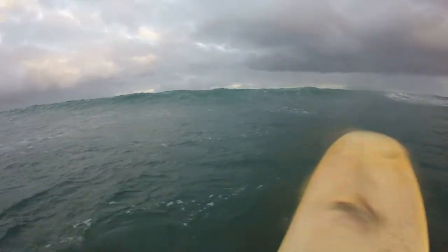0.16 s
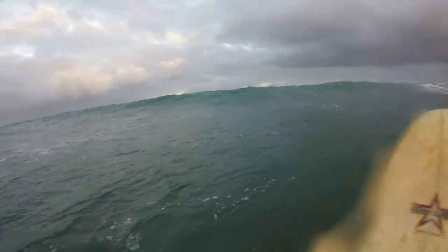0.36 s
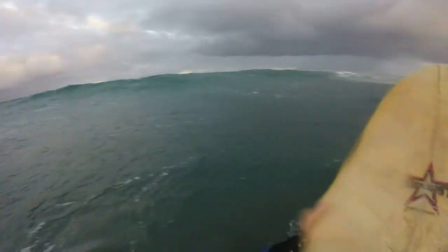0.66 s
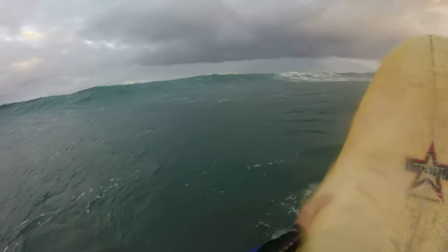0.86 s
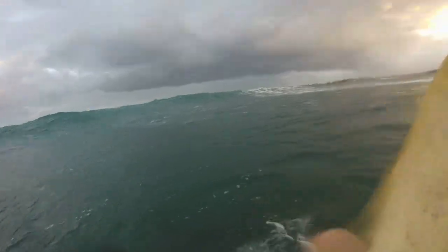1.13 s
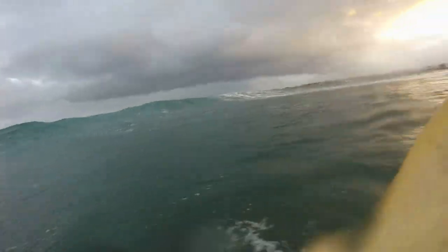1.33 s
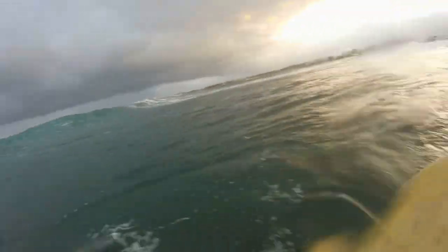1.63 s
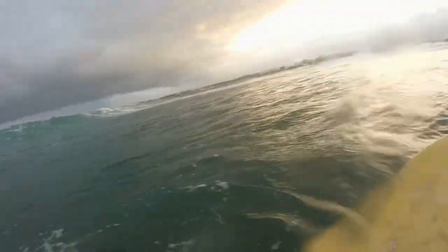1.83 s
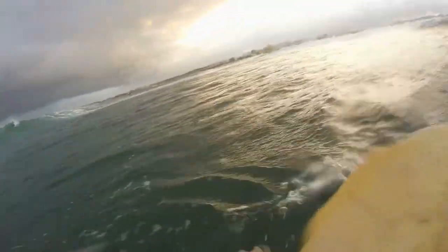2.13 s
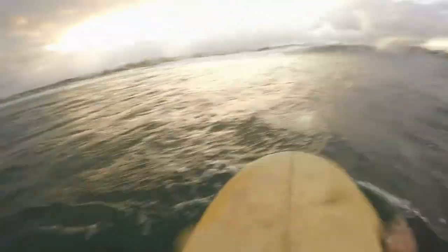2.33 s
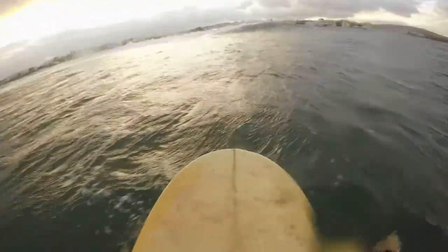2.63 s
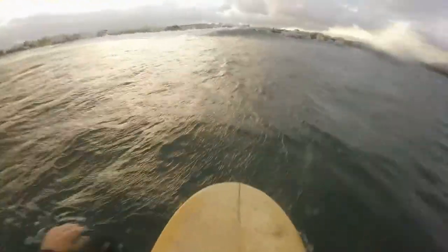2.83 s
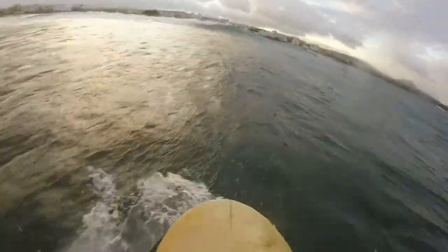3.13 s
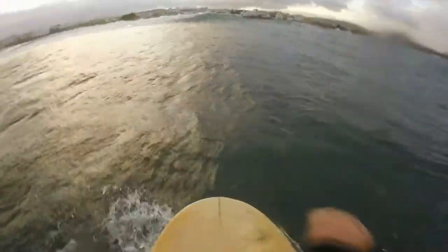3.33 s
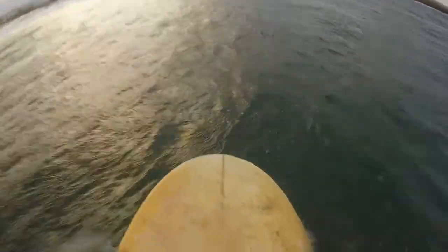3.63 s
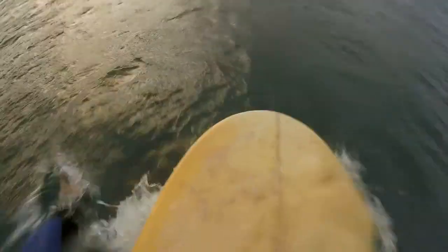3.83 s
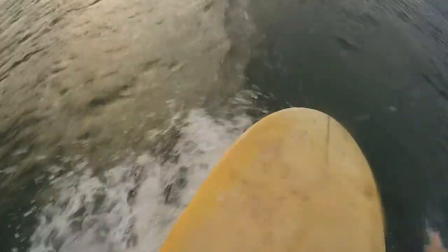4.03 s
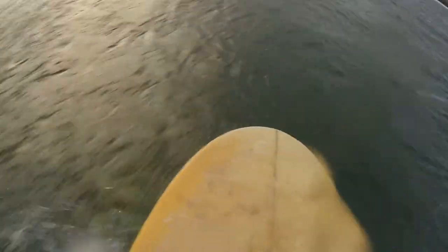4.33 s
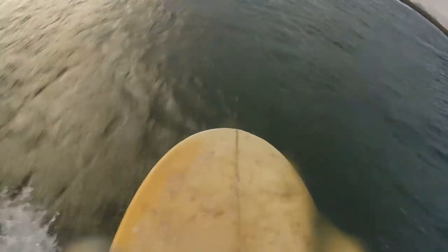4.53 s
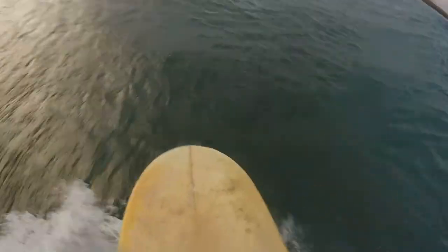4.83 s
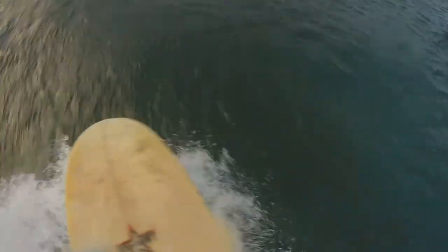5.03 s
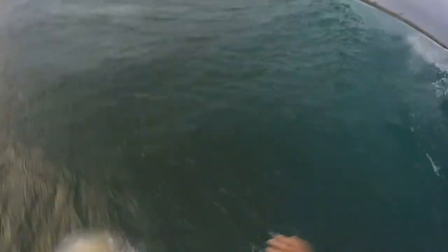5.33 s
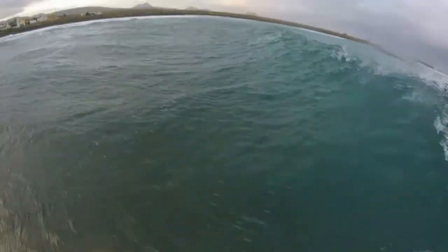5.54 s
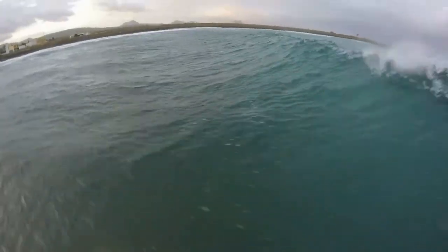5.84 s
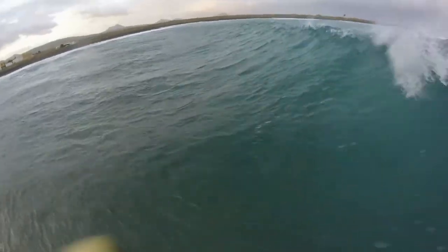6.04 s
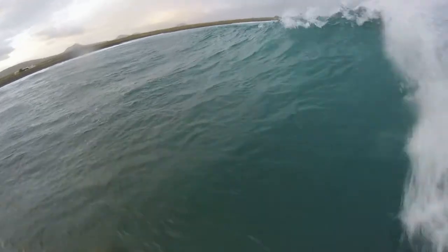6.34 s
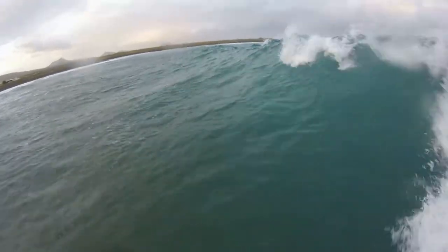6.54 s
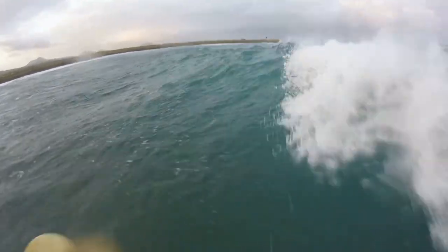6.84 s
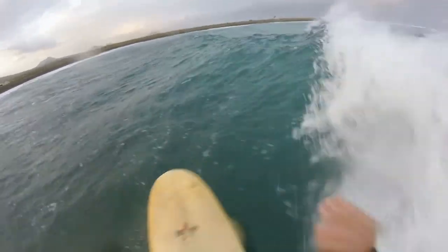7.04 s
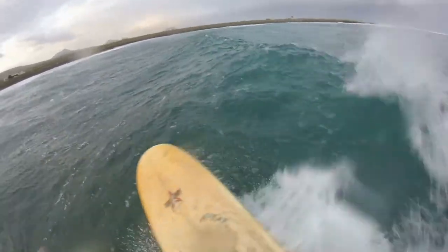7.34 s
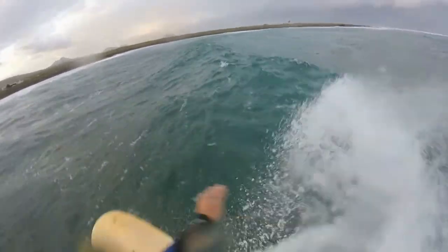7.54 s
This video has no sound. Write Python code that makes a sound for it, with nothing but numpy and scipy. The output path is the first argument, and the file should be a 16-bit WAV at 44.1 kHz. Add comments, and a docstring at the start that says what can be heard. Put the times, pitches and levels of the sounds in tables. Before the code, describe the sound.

Heard from a microphone in a waterproof case moving with a surfer, gentle seawater sloshes and fizzes around the board while droplets tap the case. Midway the water runs faster, with sharper splashes, a few gulps and low thumps from wind and movement. A breaking wave then takes over with a loud, slightly hollow rush and fine hiss above a low surf roar, easing a little at the end.

```python
"""At sea on a surfboard, heard from a camera in a sealed housing that rides with the surfer.
Water laps and rushes along the board with small bubbles and low gulps, then whitewater breaks beside it.
The rush and the spray take on the housing's resonances; drops knock and tick on its shell.
Wind and body movement shake the mount in the bass."""
import sys
import numpy as np
from scipy import signal
from scipy.fft import rfft, irfft, next_fast_len
from scipy.io import wavfile
from scipy.ndimage import uniform_filter1d, map_coordinates

SR = 44100
rng = np.random.default_rng(int(sys.argv[2]) if len(sys.argv) > 2 else 0)


def inscribe(sig):
    """Save sig as 16-bit PCM at rate SR to the path in sys.argv[1].

    A 1-D sig is mono; a 2-D sig holds one channel per row.
    Samples are clipped to [-1, 1] before scaling.
    """
    pcm = np.round(np.clip(np.atleast_2d(sig).T, -1, 1) * 32767)
    wavfile.write(sys.argv[1], SR, pcm.astype(np.int16))


N = 338688

# Fader ride of the spray. Each row: time in seconds, level in dB.
SPRAY_LEVEL = [(0, -66.5), (.45, -66), (.8, -64), (.9, -66), (1.02, -67), (1.14, -63), (1.48, -60),
               (1.55, -65), (1.7, -67), (1.85, -69), (2.01, -70), (2.12, -67), (2.3, -62.5), (2.7, -62),
               (3.25, -58), (3.74, -59), (3.88, -55), (4.27, -51), (4.47, -54.5), (4.61, -49),
               (4.75, -53.5), (5.35, -48.5), (5.8, -53.5), (6.1, -47.5), (6.5, -43.5), (6.8, -47.5),
               (7.4, -43), (7.68, -48.5)]
# Tone of lapping water. Each row: frequency in Hz, gain in dB.
LAP_EQ = [(300, -35), (900, -1), (1500, 1.5), (1800, -8.5), (2200, -4.5), (2400, -11.5), (2900, -2.5),
          (4500, -7), (7000, -14.5), (12000, -16), (14000, -70)]
# Tone of a drop's bright tick. Each row: frequency in Hz, gain in dB.
TICK_EQ = [(2000, -56), (4500, -7), (6000, -6), (9000, -0.5), (12000, -7), (14000, -40)]


def water():
    """Rush and spray, moving together as the flow sloshes and surges."""
    # Each row: time in seconds, share of the rush that is lapping from 0 to 1; the rest is whitewater.
    lapping_share = [(0, 0.63), (1.5, 0.12), (2.2, 0.78), (2.75, 0.65), (3.7, 0.3), (4.2, 0.3), (5.2, 0.2),
                     (5.5, 0.12), (6.3, 0.1), (6.8, 0.14), (7.68, 0.03)]
    lapping = curves(lapping_share)[0]
    slosh = np.sqrt(lapping) * wobble(16)
    surge = amp(0.2 * wobble(6.7))
    return surge * (rush(lapping, slosh) + spray(lapping, slosh))


def rush(lapping, slosh):
    """Frothy lapping at the rails crossfades with steadier whitewater; both ring the shell."""
    # Fader ride of the rush. Each row: time in seconds, level in dB.
    rush_level = [(0, -52.5), (.8, -49), (1.0, -52.5), (1.22, -45), (1.52, -51.5), (1.62, -49.5),
                  (2.01, -51.5), (2.1, -47.5), (2.63, -45), (2.85, -46), (3.05, -44), (3.25, -41),
                  (3.76, -45.5), (3.84, -40.5), (3.92, -41), (4.0, -36), (4.2, -38), (4.3, -36),
                  (4.6, -37.5), (4.9, -39.5), (5.28, -39), (5.5, -28.5), (5.75, -27.5), (6.08, -30.5),
                  (6.3, -28), (6.43, -31.5), (6.56, -30.5), (6.78, -32.5), (6.98, -27.5), (7.25, -28),
                  (7.36, -31), (7.68, -36.5)]
    # Tone of whitewater. Each row: frequency in Hz, gain in dB.
    whitewater_eq = [(300, 16.5), (900, 1), (1250, 4.5), (1420, 7.5), (1700, 3.5), (2500, -0.5),
                     (2750, -5.5), (3300, -4), (4000, -7.5), (7000, -20), (12000, -39), (14000, -70)]
    # Rings of the shell, and a broad churning band near 700 Hz. Each row: pitch in Hz, width in Hz, base swing
    # in dB, flares a second.
    rings = [(703, 360, 2, 20), (1490, 163, 2.5, 75), (1833, 140, 3, 63), (2174, 190, 5.5, 49),
             (3920, 390, 2.5, 70)]
    # Each row: time in seconds, then each band's level against the rush in dB.
    ring_levels = [(0, -12, -18, -12, -12, -29), (.22, -13, -12, -6, -15, -13),
                   (.5, -15, -13, -7.5, -15, -16), (.75, -16, -8, -13, -14, -18),
                   (.95, -15, -16, -15, -11, -22), (1.2, -18, -20, -10, -17, -20),
                   (1.5, -18, -16, -7, -14, -21), (1.8, -15, -15, -13, -11, -39),
                   (2.3, -16.5, -11, -18, -13, -34), (2.8, -15.5, -6.5, -27, -12, -29),
                   (3.4, -21.5, -9, -22, -26, -33), (4.2, -20, -4.5, -11, -7.5, -19),
                   (4.8, -49, -9.5, -17, -12, -32), (5.2, -38, -7, -12, -22, -17),
                   (5.5, -36, -7.5, -21, -23, -21), (5.85, -30, -8.5, -26, -8, -23),
                   (6.2, -22.5, -6, -23, -20, -22.5), (6.55, -23.5, -23, -8, -6, -12.5),
                   (6.8, -22, -7.5, -21, -18, -20), (7.1, -28, -5.5, -25, -17, -22),
                   (7.4, -24, -9, -17, -12, -17), (7.68, -24, -17, -16, -16, -15)]
    lap = patchy(depth_db=1.0) + 0.34 * froth(count=5000, centre_hz=2174, cycles=5.8, spread_db=2.2)
    lap = through_shell(amp(2.0 * slosh) * lap, LAP_EQ)
    whitewater = through_shell(amp(0.52 * wobble(30)) * patchy(depth_db=1.27), whitewater_eq)
    flow = np.sqrt(lapping) * lap + np.sqrt(1 - lapping) * whitewater
    return amp(curves(rush_level)[0]) * (flow + flaring_bands(rings, ring_levels, lapping))


def spray(lapping, slosh):
    """Fine spray hisses and wakes the shell's high rings; it flutters and fizzes where water laps."""
    # Tone of the spray. Each row: frequency in Hz, gain in dB.
    spray_eq = [(1500, -44), (3000, -2.5), (3900, 4), (4800, 0.5), (9000, 0), (11300, -3), (12200, -12),
                (13200, -24), (14000, -45)]
    # High rings of the shell, and a broad band near 12 kHz that comes and goes. Each row: pitch in Hz, width in
    # Hz, base # swing in dB, flares a second.
    rings = [(5500, 560, 2.5, 7.4), (6490, 280, 3, 12), (8060, 700, 2.5, 10), (9250, 440, 5.5, 11),
             (12000, 1200, -3, 9)]
    # Each row: time in seconds, then each band's level against the spray in dB.
    ring_levels = [(0, -20, -14, -22, -14, -45), (1.3, -18, -10, -32, -23, -45),
                   (2.2, -24, -14, -13, -15, -42), (3.1, -18, -13, -18, -22, -38),
                   (3.9, -13, -12, -18, -21, -32), (4.5, -12, -14, -18, -20, -30),
                   (5.2, -21, -13, -15, -17.5, -26), (5.8, -10, -10, -11, -15, -32),
                   (6.2, -14, -9, -23, -16, -27), (6.6, -18, -10, -16, -17, -20),
                   (7.0, -12, -10, -15, -24, -30), (7.4, -18, -9.5, -14, -18, -23),
                   (7.68, -19, -7, -14, -20, -29)]
    flutter = amp(0.88 * slosh + 3.8 * np.sqrt(lapping) * wobble(45))
    fizz = 0.65 * lapping * froth(count=5000, centre_hz=6370, cycles=3.1, spread_db=5.0)
    hiss = through_shell(flutter * (patchy(depth_db=1.4) + fizz), spray_eq)
    return amp(curves(SPRAY_LEVEL)[0]) * (hiss + flaring_bands(rings, ring_levels, lapping))


def flaring_bands(rings, levels, lapping):
    """Pattering water makes bands of noise flare, more where water laps; most are rings of the shell, some are
    broad bands."""
    ringing = np.zeros(N)
    for (hz, width, swing_db, rate), level_db in zip(rings, curves(levels)):
        patter = amp(swing_db * (0.47 + np.sqrt(lapping)) * wobble(rate)) * rng.standard_normal(N)
        ringing += amp(level_db) * unit(filtered(patter, lambda f: resonance(f, hz, width) ** 2))
    return ringing


def drops():
    """A drop hits the shell: a tick pitched by its size, a clack and a knock on the lower resonances."""
    # Each row: start in seconds, tick peak in dB, tick pitch in Hz, tick width as a share of its pitch,
    # clack over the tick in dB, clack pitch in Hz, knock over the tick in dB, knock pitch in Hz.
    drop_hits = [(0.1024, -45, 7470, .08, -10, 3450, 5, 1840),
                 (1.0353, -43, 6640, 0.28, -1.5, 3900, 0, 1840),
                 (1.1964, -42.5, 6610, .2, 3, 3900, 12, 1840),
                 (1.5677, -48, 8300, .15, -6.5, 3450, -4, 1840),
                 (1.7504, -35.5, 7870, .2, -11, 3450, 1, 1840), (1.7554, -44.5, 6760, .1, 6, 3300, 3, 1840),
                 (1.7717, -40, 8200, .2, -3, 3300, 7, 1840), (1.8277, -32.5, 8300, 0.11, 0, 3500, -1, 2150),
                 (1.8288, -43.5, 8300, .2, 17, 3500, 20.5, 2160),
                 (1.8337, -40.5, 6500, .25, 5, 4400, 15.5, 1800), (1.8962, -41, 7190, .2, 0, 3420, 7, 1800),
                 (1.9195, -54, 8110, .3, -1, 3450, 5, 1840), (1.9227, -36, 7750, .2, 15, 3220, 17, 1950),
                 (1.9243, -45.5, 7500, .3, 18, 3200, 20, 1950),
                 (1.9276, -44.5, 7380, .2, 9, 3200, 23, 1900), (1.9318, -52, 7500, .25, 6, 3450, 7, 1800),
                 (1.9575, -51, 7000, .3, 11, 3700, 5, 1800), (1.978, -35, 6400, 0.28, 7, 3270, 5.5, 1890),
                 (1.9793, -43, 7500, .3, 14, 3200, 21, 1900), (2.3477, -47, 8650, .08, -3, 3450, 11, 1840),
                 (2.4686, -48, 6580, .08, -1.5, 3450, 4, 1840), (2.6, -41, 6410, .15, 8.5, 3450, 12, 2000),
                 (2.999, -43, 10200, .25, -5, 3450, -.6, 1840), (3.5154, -42, 5990, .15, 0, 3450, -7, 1840),
                 (3.648, -38, 8000, .25, 4, 3450, -5, 1840), (3.6556, -37, 6470, .2, -1, 3900, -1, 1840),
                 (3.8025, -39, 8300, .12, 11.5, 2900, 12, 2200), (3.8388, -47, 5690, .1, 5, 3450, 22, 2200),
                 (4.112, -34, 7120, .35, 1, 3900, -4.5, 1840),
                 (4.1402, -41.5, 5910, .25, 12, 3800, -2, 1840),
                 (4.1605, -28.5, 7600, .35, 1, 3900, -8, 1840),
                 (4.2547, -20.5, 8850, 0.26, 5, 2700, -3, 2400),
                 (4.2555, -26, 10500, .4, 4.5, 3920, 6, 1800), (4.2618, -38, 9000, .15, 0, 3900, 10, 2000),
                 (4.5376, -37, 8400, .12, 3.5, 3450, 7, 1840), (4.5477, -39, 8300, .15, 15, 2870, 16, 1650),
                 (4.791, -40, 6200, .15, 5, 4000, 3, 1700), (4.8108, -44, 6630, .2, -3, 3450, 31.5, 1480),
                 (4.8368, -23.5, 7930, 0.059, -11, 3450, -10, 1840),
                 (5.5276, -27, 6200, .12, -13, 3450, -13, 1840),
                 (6.7978, -20, 8160, 0.062, -20, 3450, -4, 1840)]
    rows = np.vstack([drop_hits, stray_drops()])
    start, db, tick_hz, tick_width, clack_db, clack_hz, knock_db, knock_hz = rows.T[..., None]
    # Tone of the clack. Each row: frequency in Hz, gain in dB.
    clack_eq = [(1500, -21), (2800, -9), (4200, -5.5), (6000, -7), (14000, -70)]
    # Tone of the knock. Each row: frequency in Hz, gain in dB.
    knock_eq = [(400, -28), (1100, 1), (2300, -2), (2800, -8), (3300, -29), (6000, -40), (14000, -80)]
    lead = 200  # samples ahead of the blow
    t = (np.arange(SR // 25) - lead) / SR
    splat_stretch = amp(-0.21 * (db + 35))  # ticks above -35 dB get a tighter splat

    def strike(hz, width_hz, eq, splat, base_ms, bypass):
        """A sharp blow and a dying splat of noise ring one resonance, at a peak of 1."""
        fade_ms = np.clip(base_ms * splat_stretch, .1, 9)
        blow = splat * rng.standard_normal((len(rows), len(t))) * np.exp(-1000 * t / fade_ms) * (t > 0)
        blow[:, lead] = 1
        rung = filtered(blow, lambda f: bypass + resonance(f, hz, width_hz))
        hit = housing(coloured(rung, eq))
        return hit / np.abs(hit).max(axis=1, keepdims=True)

    tick = strike(tick_hz, tick_width * tick_hz, TICK_EQ, splat=0.19, base_ms=1, bypass=0.14)
    clack = strike(clack_hz, 480, clack_eq, splat=0.32, base_ms=2, bypass=0.2)
    knock = strike(knock_hz, 180, knock_eq, splat=0.07, base_ms=1.9, bypass=0.6)
    hits = amp(db) * (tick + amp(clack_db) * clack + amp(knock_db) * knock)
    at = np.round(start * SR).astype(int) - lead + np.arange(len(t))
    return np.bincount(np.abs(at).ravel(), hits.ravel(), N + SR)[:N]


def stray_drops(count=24, until_s=3.7, over_spray_db=10):
    """Rows for faint drops at random moments while paddling, their level following the spray."""
    start = rng.random(count) * until_s
    size, pitch, clack, knock = rng.standard_normal((4, count))
    db = curves(SPRAY_LEVEL)[0][(start * SR).astype(int)] + over_spray_db + 2.2 * size
    tick_hz, tick_width = 6800 * np.exp(.13 * pitch), np.full(count, .15)
    clack_db, clack_hz = 0.73 + 4 * clack, 3450 * np.exp(.08 * knock)
    knock_db, knock_hz = 1.5 + 4 * knock, 1840 * np.exp(.08 * clack)
    return np.transpose([start, db, tick_hz, tick_width, clack_db, clack_hz, knock_db, knock_hz])


def splashes():
    """Water thrown over the shell: brief bursts of noise with a wet body and a hiss on top."""
    # Each row: start in seconds, length in seconds, body level in dB, hiss level in dB.
    bursts = [(0.786, 0.023, -48, -66), (3.798, 0.006, -30.5, -44), (3.839, 0.011, -37, -65),
              (4.535, 0.022, -33, -43.5), (4.609, 0.0069, -42, -49)]
    start, length, body_db, hiss_db = np.transpose(bursts)[..., None]
    age = np.clip((np.arange(N) / SR - start) / length, 0, 1)
    swell = np.sqrt(np.abs(np.sin(np.pi * age)))
    body = through_shell(rng.standard_normal(N), LAP_EQ)
    hiss = through_shell(rng.standard_normal(N), TICK_EQ)
    return (amp(body_db) * swell).sum(axis=0) * body + (amp(hiss_db) * swell).sum(axis=0) * hiss


def bubbles(start, hz, db, cycles, rise):
    """Each bubble is a softly started, dying sine that glides; a rising one is nearing the surface."""
    t = np.arange(SR // 40) / SR
    age = t * (hz / cycles)[:, None]
    phase = 2 * np.pi * hz[:, None] * t * (1 + rise[:, None] * age / 2)
    envelope = 3 * age * np.exp(1 - 3 * age)
    plips = amp(db)[:, None] * envelope * np.sin(phase)
    at = (start * SR).astype(int)[:, None] + np.arange(len(t))
    return np.bincount(at.ravel(), plips.ravel(), N + SR)[:N]


def single_bubbles():
    """Separate bubbles plip out above the wash."""
    # Each row: start in seconds, pitch in Hz, peak in dB, life in cycles,
    # glide over that life as a share of the pitch (negative falls).
    plips = [(.03, 2200, -42, 13, -0.0078), (.066, 1840, -45, 9.2, 0.48), (.305, 1840, -42, 15, .05),
             (0.358, 1760, -41, 8.9, -0.017), (.388, 736, -45, 8.7, 0.85), (.405, 1460, -39.5, 8.6, 0.048),
             (0.551, 1850, -47, 9, -0.05), (.672, 1540, -44, 8.2, -0.0093), (.816, 1750, -40, 9, 0.11),
             (.852, 1880, -43, 10, -0.044), (1.125, 3930, -48, 20, 0.041), (1.25, 2320, -38, 15, -0.061),
             (1.347, 1800, -40, 12, -0.053), (1.588, 1360, -42, 6.8, 0.22), (2.474, 2070, -37, 10, .05),
             (2.572, 1430, -39, 10, -0.097), (1.189, 1820, -37, 14, 0.043), (2.136, 3080, -38, 11, -0.24),
             (2.156, 4000, -50, 14, .03), (2.182, 3900, -47, 14, 0.056), (2.239, 1520, -38, 6, 0.028),
             (2.303, 1480, -34, 6.5, 0.093), (2.443, 2150, -32.5, 11, 0.041),
             (2.664, 1500, -34, 9.3, 0.069), (2.702, 1440, -37.5, 8.6, -0.17), (2.775, 1460, -33, 5.9, .05),
             (2.788, 1500, -34.5, 7.8, -0.16), (2.885, 3800, -38, 23, .03), (3.187, 3000, -34, 8.9, 0.14),
             (3.744, 646, -44, 5, 0.22), (3.835, 670, -40.5, 6.6, 0.24),
             (4.8135, 1450, -22.5, 6.7, -0.0037), (1.369, 3950, -47, 16, -0.021), (1.4, 4000, -49, 16, .02),
             (1.448, 3900, -49, 14, .02), (1.463, 3950, -52, 14, .02), (1.478, 3900, -51, 14, .02),
             (4.844, 2150, -25, 6, 0.047), (4.85, 2000, -29, 6, 0.038), (4.323, 1600, -29, 8, 0.051),
             (4.553, 1690, -28, 5, -0.15)]
    return bubbles(*np.transpose(plips))


def froth(count, centre_hz, cycles, spread_db):
    """Many scattered bubbles of all sizes, a few louder than the rest."""
    when, faintness, life = rng.random((count, 3)).T
    hz = np.clip(centre_hz * np.exp(0.46 * rng.standard_normal(count)), 400, 12000)
    db = -spread_db * np.log(faintness + 0.03)
    return unit(bubbles(when * N / SR, hz, db, cycles * (0.35 + 1.65 * life), rise=0.11 * life))


def gulps():
    """Trapped air under the board swells and drops in pitch; every other throb is stronger."""
    # Each row: start in seconds, length in seconds, first and last pitch in Hz, peak of the tone in dB,
    # sub-octave over the tone in dB.
    air_pockets = [(3.223, 0.077, 197.8, 163, -53, 16.5), (4.25, 0.07, 179.7, 158, -35, 1),
                   (4.403, 0.064, 261, 245, -44, -8), (5.109, 0.14, 184.2, 113, -33.5, 1.5)]
    throbs, t = np.zeros(N), np.arange(N) / SR
    for start, length, start_hz, end_hz, db, sub_db in air_pockets:
        age = np.clip((t - start) / length, 0, 1)
        phase = 2 * np.pi * np.cumsum(start_hz + (end_hz - start_hz) * age ** 1.32) / SR
        swell = np.sqrt(np.abs(np.sin(np.pi * age ** 1.95))) * (age < 1)
        throbs += amp(db) * swell * (np.sin(phase) + amp(sub_db) * np.sin(phase / 2))
    return throbs


def mount_rumble():
    """Wind and movement shake the mount in lumps; each jolt of the board swells and fades on top."""
    # Fader ride of the rumble. Each row: time in seconds, shake level in dB, thump level in dB.
    rumble_levels = [(0, -50.5, -54.5), (1.4, -49.5, -55.5), (2.5, -49.5, -53), (3.1, -39.5, -53.5),
                     (3.55, -41, -56), (3.9, -37.5, -50.5), (4.1, -39.5, -43), (5.3, -37, -45),
                     (5.7, -45, -45), (6.1, -44, -43), (6.9, -44.5, -40.5), (7.68, -43.5, -46)]
    # Each row: time of the peak in seconds, length in seconds, shake level in dB, thump level in dB.
    jolts = [(1.644, 0.069, -44, -54), (1.786, 0.15, -55, -50), (2.11, 0.2, -42, -68),
             (2.55, 0.19, -39, -61), (3.275, 0.13, -42, -41), (3.952, 0.17, -38, -71),
             (4.187, .07, -53, -41), (4.267, 0.065, -32, -40), (4.58, 0.1, -63, -55),
             (4.765, 0.14, -35.5, -63), (5.037, 0.085, -35, -50), (5.24, 0.091, -30, -39)]
    # Tone of the sub-bass shake. Each row: frequency in Hz, gain in dB.
    shake_eq = [(8, 7), (20, 8), (45, -0.5), (70, -6.5), (150, -38), (400, -120)]
    # Tone of the bass thump. Each row: frequency in Hz, gain in dB.
    thump_eq = [(30, -3.5), (65, 2), (110, 0), (170, -7.5), (215, -15), (500, -120)]
    shake_db, thump_db = curves(rumble_levels)
    centre, length, jolt_shake_db, jolt_thump_db = np.transpose(jolts)[..., None]
    swell = np.cos(np.pi * np.clip((np.arange(N) / SR - centre) / length, -.5, .5)) ** 2
    shake_gain = amp(shake_db + 0.3 * wobble(6)) + (amp(jolt_shake_db) * swell).sum(axis=0)
    thump_gain = amp(thump_db + 1.5 * wobble(6.8)) + (amp(jolt_thump_db) * swell).sum(axis=0)
    shake = coloured(rng.standard_normal(N), shake_eq)
    thump = coloured(amp(1.15 * wobble(25)) * rng.standard_normal(N), thump_eq)
    return shake_gain * unit(shake) + thump_gain * unit(thump)


def surf_roar():
    """Breaking surf lays a low, gently churning bed of noise under everything."""
    # Fader ride of the roar. Each row: time in seconds, level in dB.
    roar_level = [(0, -55.5), (2.0, -55), (2.6, -54), (3.9, -54), (4.0, -48.5), (4.13, -42.5),
                  (4.22, -45.5), (4.35, -48.5), (4.7, -45), (5.35, -46.5), (5.6, -41.5), (6.3, -42.5),
                  (7.1, -40.5), (7.68, -46.5)]
    # Tone of the roar. Each row: frequency in Hz, gain in dB.
    roar_eq = [(35, -50), (60, -10), (232, -3), (415, -7.5), (469, -4.5), (591, -13), (750, -21),
               (1100, -12.5), (1430, -19), (2420, -120)]
    churn = amp(0.57 * wobble(12)) * patchy(depth_db=0.78)
    return amp(curves(roar_level)[0]) * unit(coloured(churn, roar_eq))


def housing(x):
    """The shell passes sound mostly at its steep-sided resonances, and rings only after it is struck."""
    # Resonances of the housing. Each row: frequency in Hz, width in Hz, level in dB.
    modes = [(1570, 170, -6), (1961, 960, 1), (2210, 220, -4), (2440, 220, -2), (2930, 1500, -10.5),
             (4015, 240, -12), (5830, 1500, -14), (6180, 400, -23), (7000, 2300, -15.5),
             (7700, 2300, -20.5), (8200, 410, -19), (8900, 400, -24), (10800, 7300, -24.5)]

    def response(f):
        power = sum(amp(2 * db) * np.abs(resonance(f, hz, width)) ** 3 for hz, width, db in modes)
        cepstrum = irfft(np.log(power + 1e-12) / 2)
        half = len(cepstrum) // 2
        cepstrum[1:half] *= 2  # minimum phase
        cepstrum[half + 1:] = 0
        return np.exp(rfft(cepstrum))
    return filtered(x, response)


def through_shell(x, eq):
    """x shaped by an EQ and heard through the housing, at rms 1."""
    return unit(housing(coloured(x, eq)))


def resonance(f, hz, width_hz):
    """Response of one mode, 1 at its centre."""
    return 1j * f * width_hz / (hz * hz - f * f + 1j * f * width_hz)


def filtered(x, response):
    """x times a complex response of frequency, along its last axis."""
    n = x.shape[-1]
    padded = 2 * next_fast_len(n // 2 + SR // 10)
    return irfft(rfft(x, padded) * response(np.fft.rfftfreq(padded, 1 / SR)), padded)[..., :n]


def coloured(x, eq):
    """x through an EQ of (Hz, dB) points joined on a log axis."""
    f, db = np.transpose(eq)
    return filtered(x, lambda hz: amp(np.interp(np.log(hz + 1), np.log(f + 1), db)))


def patchy(depth_db):
    """White noise with small patches of random gain in time and frequency."""
    spectra = signal.stft(rng.standard_normal(N), nperseg=256)[2]
    patches = uniform_filter1d(uniform_filter1d(rng.standard_normal(spectra.shape), 5, 0), 9, 1)
    return unit(signal.istft(spectra * amp(depth_db * unit(patches)), nperseg=256)[1][:N])


def wobble(rate):
    """A smooth random curve, rate knots a second."""
    return map_coordinates(rng.standard_normal(int(N * rate / SR) + 4), [np.arange(N) * rate / SR])


def curves(rows):
    """One value per sample for each column after the time."""
    times, *columns = np.transpose(rows)
    return [np.interp(np.arange(N) / SR, times, column) for column in columns]


def amp(db):
    """Gain of a level in dB."""
    return 10 ** (np.asarray(db) / 20)


def unit(x):
    """x at rms 1."""
    return x / np.sqrt(np.mean(x ** 2) + 1e-20)


def scene():
    """Everything at one microphone."""
    return (water() + drops() + splashes() + single_bubbles() + gulps() + mount_rumble() + surf_roar())[None]


def record(dry, top_hz=13900):
    """The camera keeps nothing above its band limit."""
    return filtered(dry[0], lambda hz: hz < top_hz)[None]


dry = scene()
out = record(dry)
inscribe(out)
```